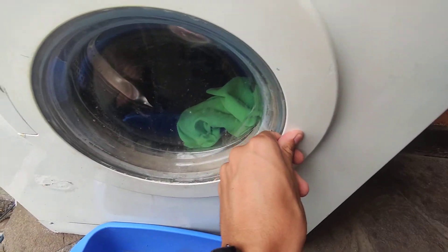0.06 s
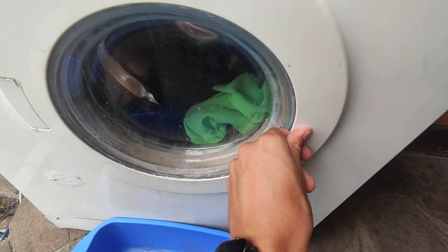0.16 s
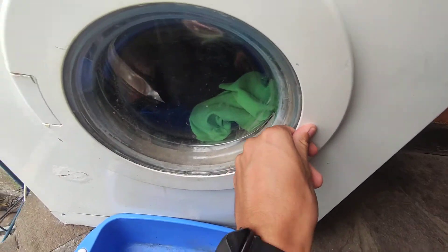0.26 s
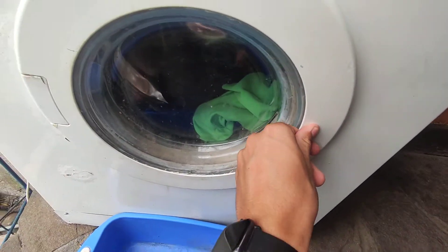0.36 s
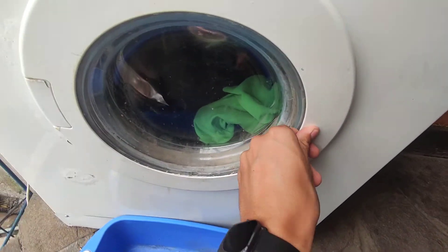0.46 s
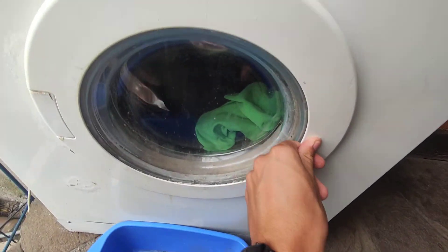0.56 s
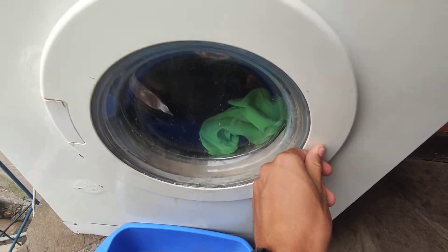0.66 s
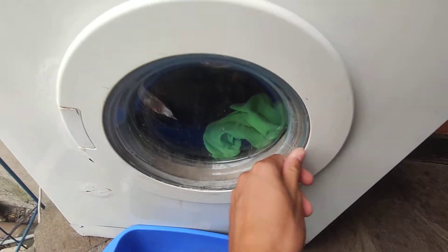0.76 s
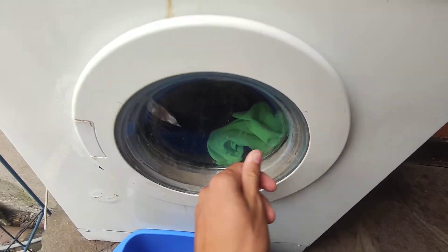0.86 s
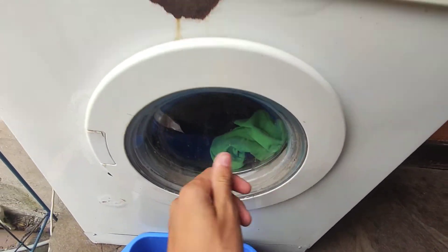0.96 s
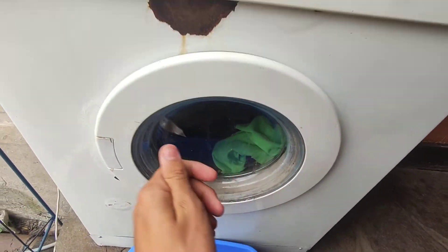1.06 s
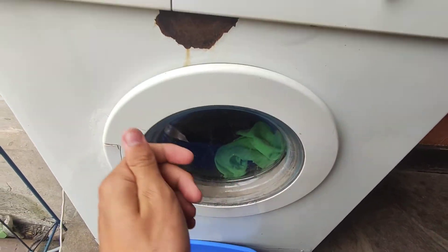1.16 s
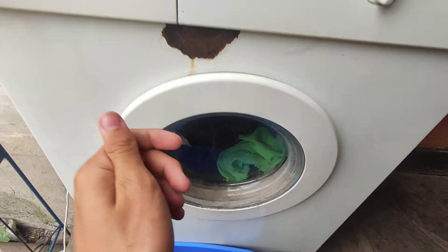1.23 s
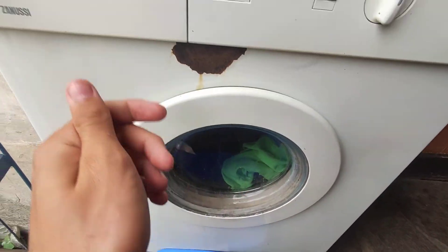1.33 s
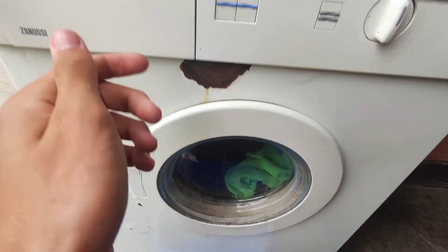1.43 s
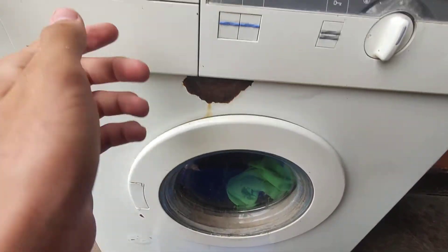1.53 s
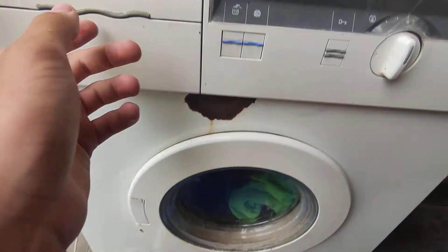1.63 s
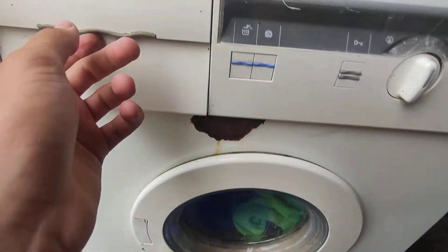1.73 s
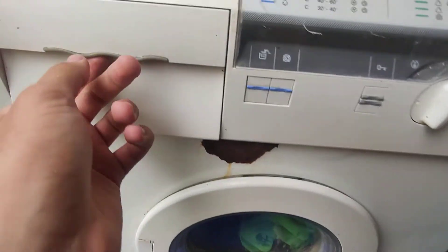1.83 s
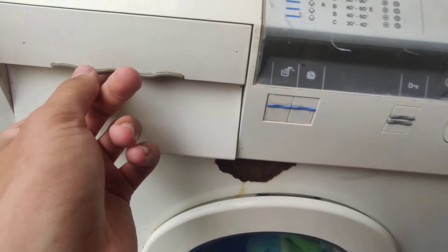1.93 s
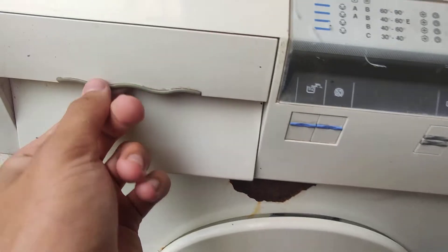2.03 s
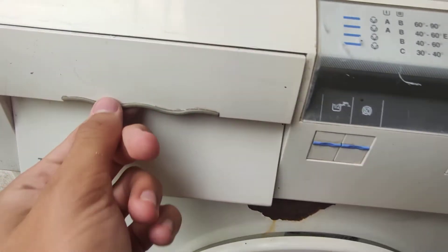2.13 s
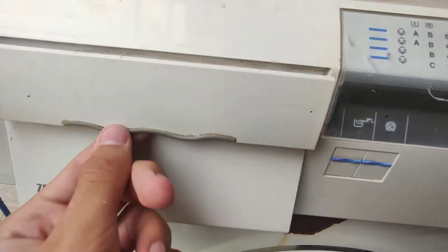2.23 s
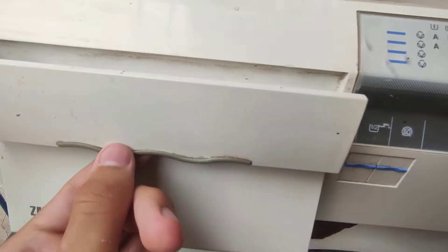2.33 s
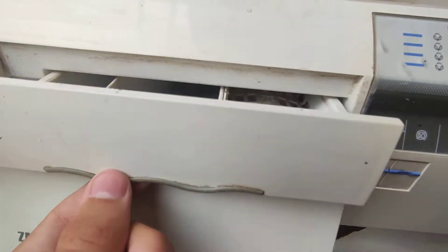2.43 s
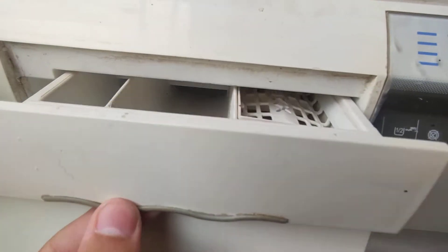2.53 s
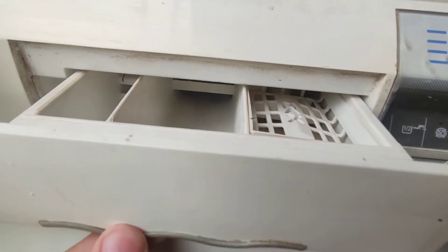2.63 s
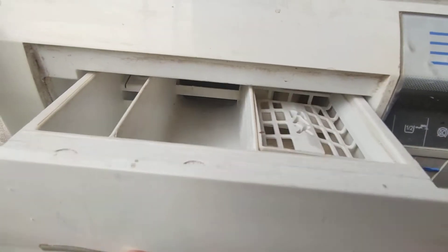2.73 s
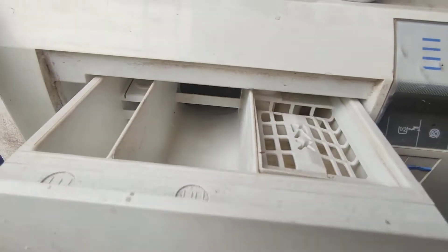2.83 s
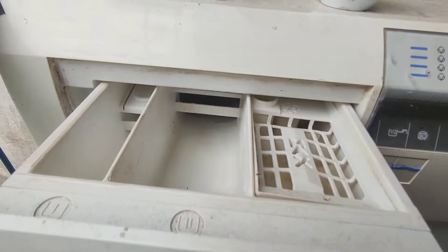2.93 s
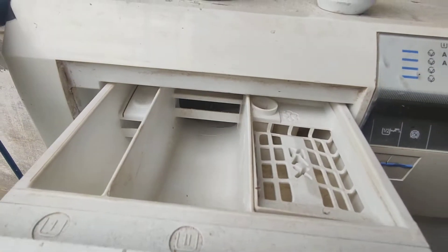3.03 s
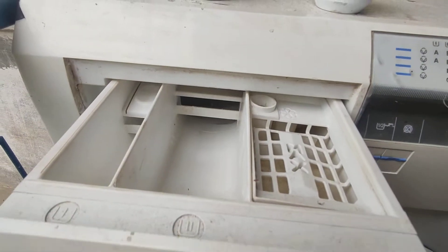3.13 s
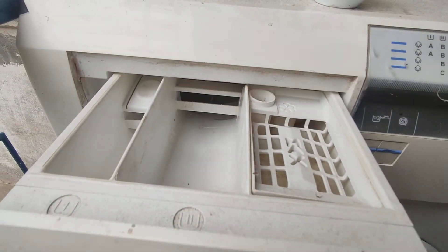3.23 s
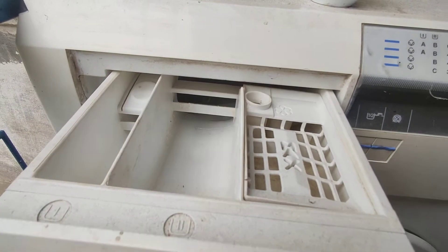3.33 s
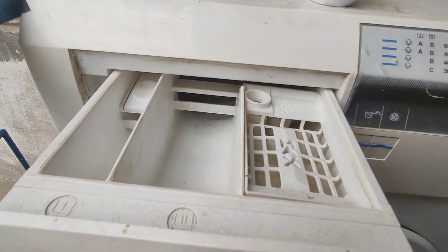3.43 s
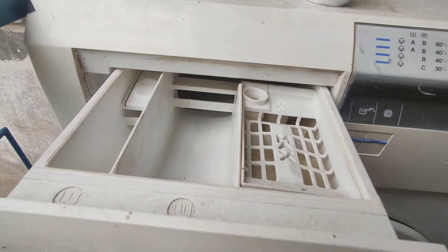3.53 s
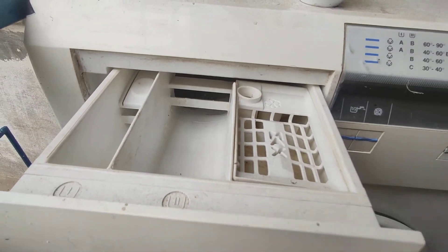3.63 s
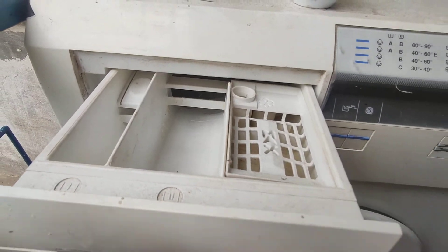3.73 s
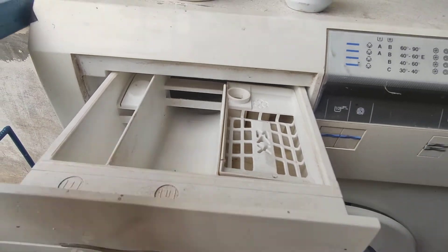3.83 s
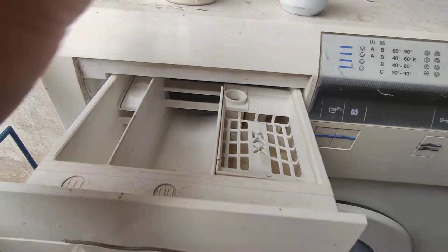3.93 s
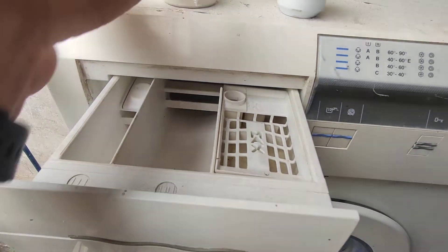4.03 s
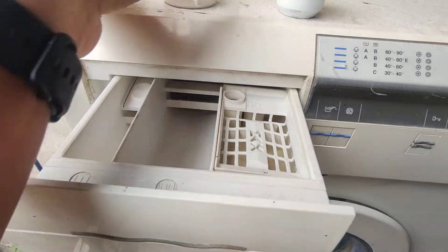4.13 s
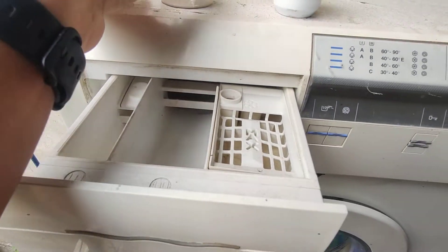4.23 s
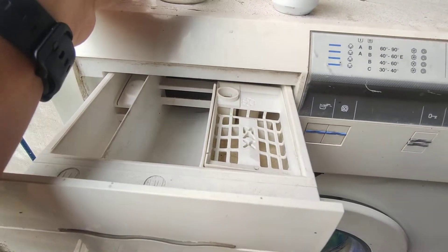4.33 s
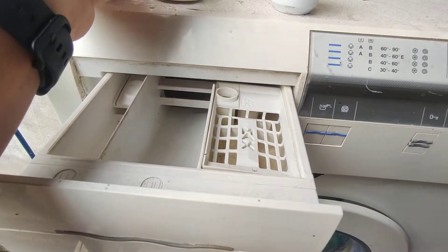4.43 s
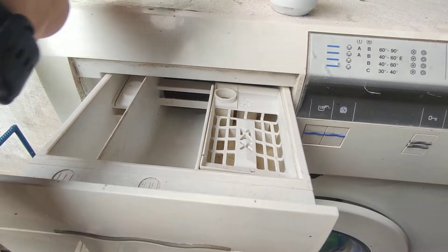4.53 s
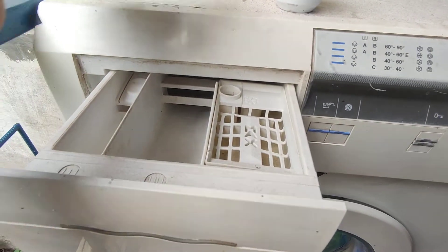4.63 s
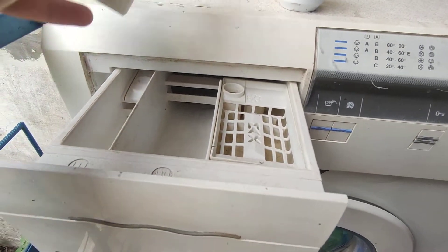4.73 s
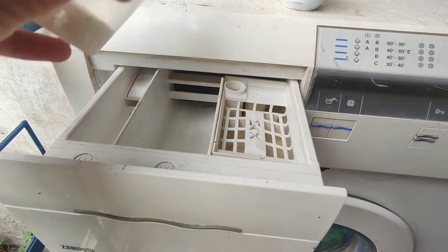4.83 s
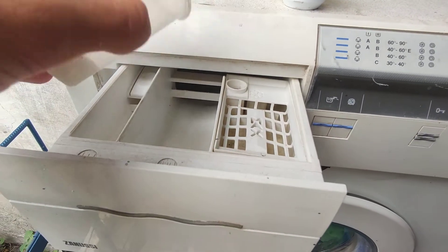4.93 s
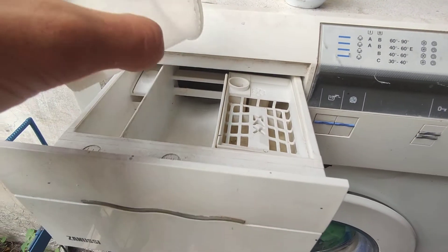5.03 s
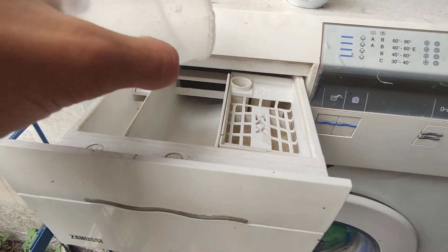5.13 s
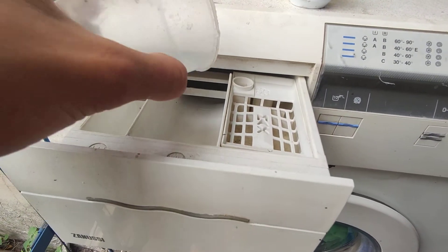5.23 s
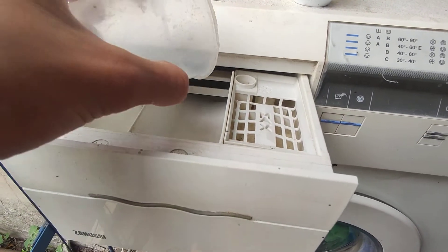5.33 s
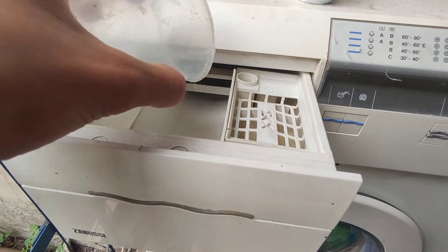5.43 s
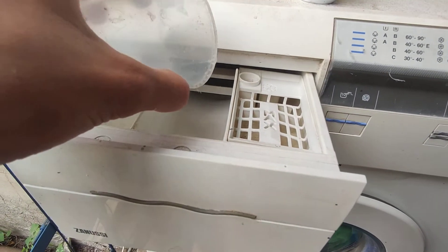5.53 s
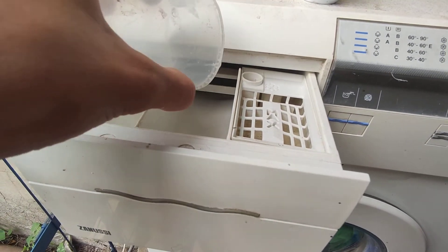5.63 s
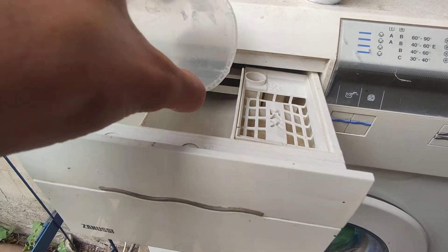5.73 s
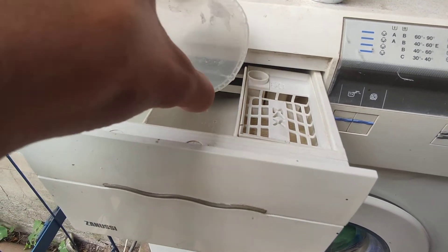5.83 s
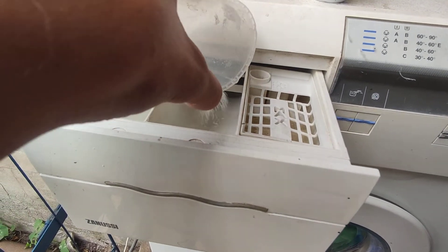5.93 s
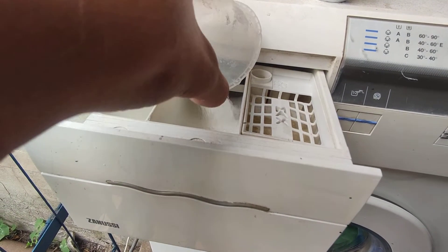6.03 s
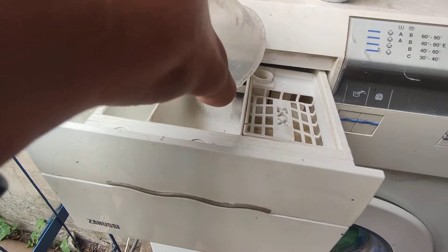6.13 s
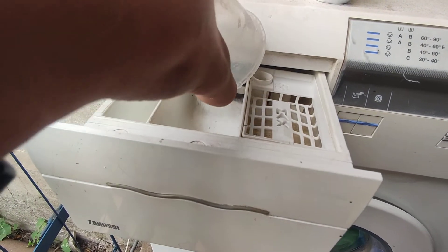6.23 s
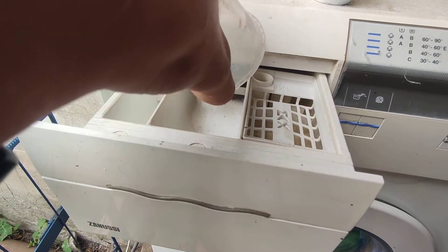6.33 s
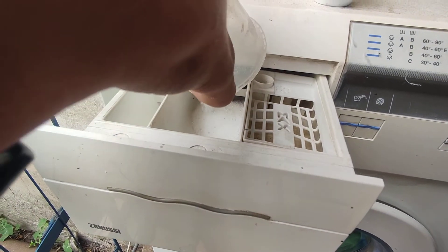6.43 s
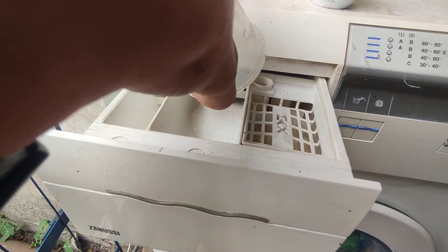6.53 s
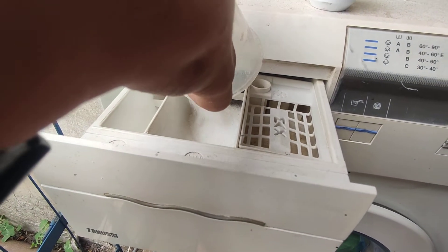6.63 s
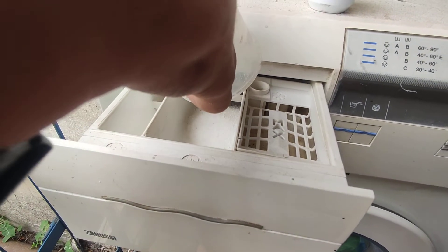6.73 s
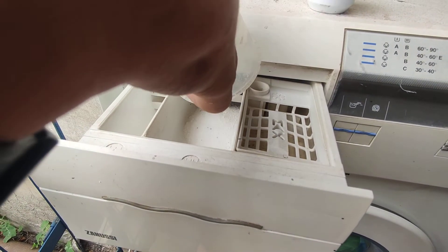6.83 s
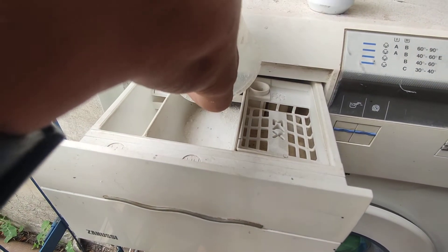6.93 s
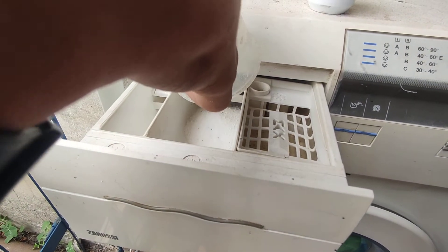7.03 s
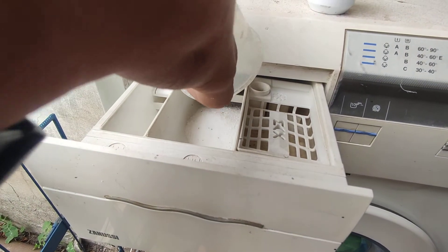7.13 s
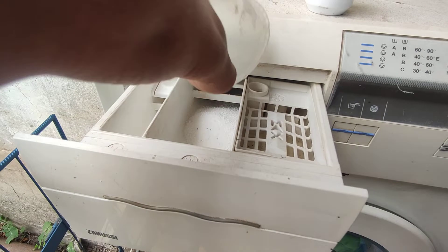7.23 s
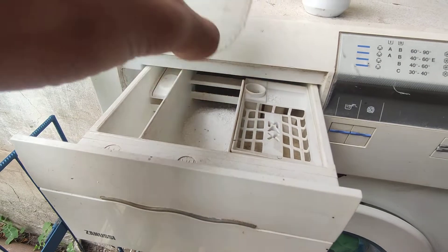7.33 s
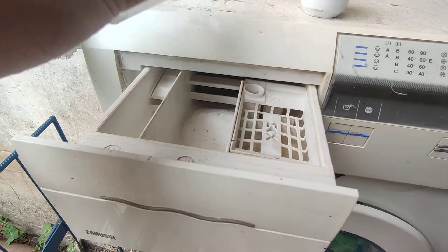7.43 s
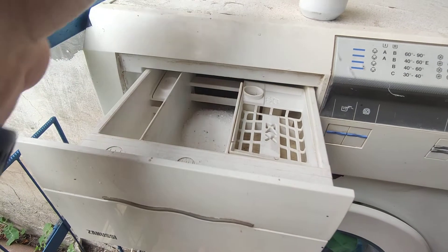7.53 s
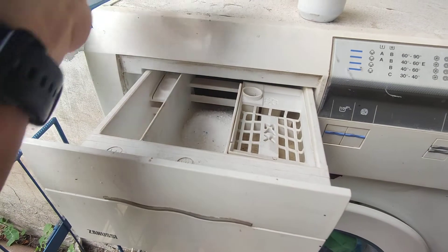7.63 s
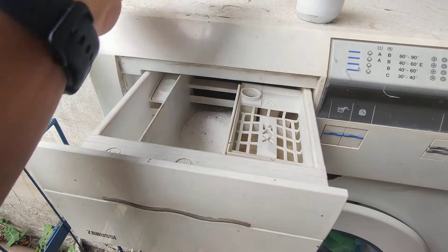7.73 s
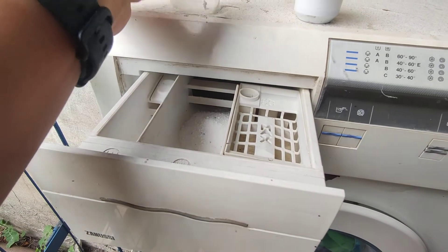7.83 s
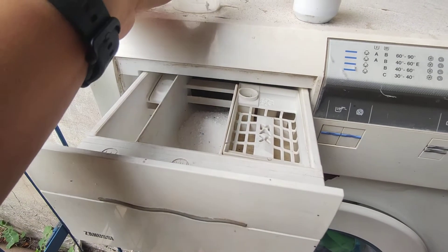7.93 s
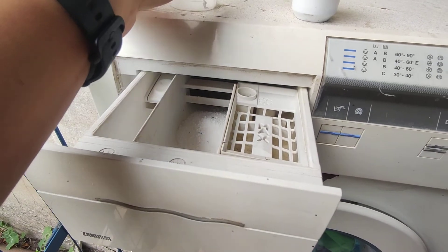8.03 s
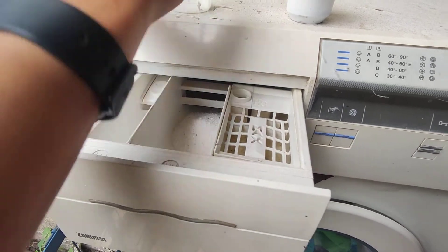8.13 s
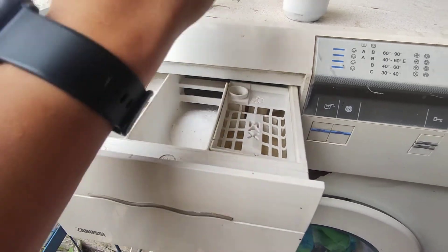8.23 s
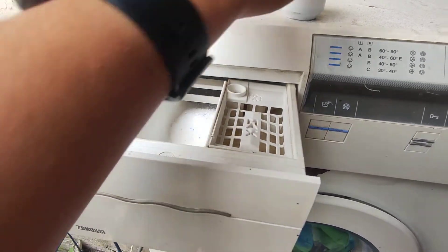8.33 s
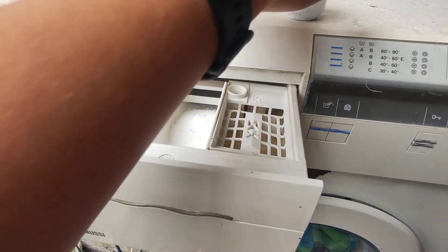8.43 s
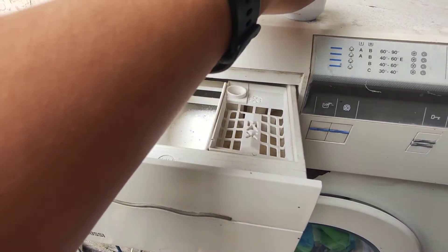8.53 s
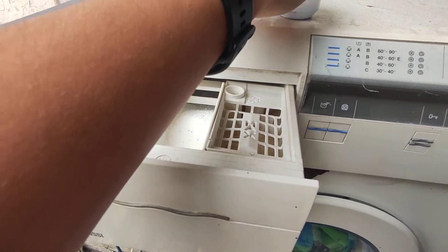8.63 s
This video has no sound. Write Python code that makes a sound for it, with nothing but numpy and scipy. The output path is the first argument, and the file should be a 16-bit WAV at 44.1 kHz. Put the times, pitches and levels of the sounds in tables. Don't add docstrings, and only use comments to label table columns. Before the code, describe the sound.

A phone held near a washer picks up one loud door thud, soft sleeve and dry skin brushing, then a stuttering plastic drawer pull with chirps and grit ticks, ending in a hard bang and a bouncing tray clatter. Quieter handling follows: cloth rustle, crinkly cup ticks, thin powder hiss, a hollow cup knock and brief scrape. Hard walls give a short echo over faint traffic and motor hum.

```python
import sys
import numpy as np
from scipy import signal
from scipy.io import wavfile
from scipy.ndimage import uniform_filter1d, map_coordinates

SR = 44100
rng = np.random.default_rng(int(sys.argv[2]) if len(sys.argv) > 2 else 0)


def wav_out(sig):
    wavfile.write(sys.argv[1], SR, np.round(np.clip(np.atleast_2d(sig).T, -1, 1) * 32767).astype(np.int16))


def invert_db(x):
    u = np.asarray(x, float) / 20
    return 10 ** u


N = 382347

EDGES = 28 * 2 ** np.arange(0, 9.3, 1 / 3)
CENTRES = np.sqrt(EDGES[1:] * EDGES[:-1])

# [t/s, peak level/dB, boom level/dB, sizzle level/dB, left-right level/dB]
DOOR_BLOWS = [
    (0.038, -42.5, -18, -27, 16),
    (0.072, -25.5, -3, -19, 3),
    (0.0794, -19.5, 2, -11, -2),
    (0.088, 1, -18, -14.5, 1.5),
    (0.0897, -14.5, -11.5, -7.5, -5.5),
    (0.121, -24, 1, -34.5, 0),
    (0.534, -29, -9, -34, 6.5),
    (0.541, -32, -4, -26, -2),
    (0.614, -41, -7, -6, -1),
    (0.634, -46.5, 14.5, -2, 0),
]
# [t/s, peak level/dB, boom level/dB, sizzle level/dB, left-right level/dB]
LATCH_PING = [
    (0.244, -39.5, -23, 0.5, 1),
]
# [t/s, peak level/dB, boom level/dB, sizzle level/dB]
DRAWER_BLOWS = [(1.73, -40, -1.5, -42), (1.762, -39, -4, -33), (1.885, -37, -14, -28), (1.927, -43, -8, 17),
                (2.093, -36, -8, 0), (2.142, -29, -13.5, -56), (2.227, -26.5, -3.5, -62),
                (2.257, -18.5, -17.5, -16), (2.274, -20.5, -23, -29), (2.286, -20.5, -33, -29),
                (2.344, -18.5, -11, -28), (2.367, -31, 7.5, -44), (2.39, -40, 3, -44), (2.43, -43, 12, -38),
                (2.524, -32, -6, -30), (2.543, -29, -3, -40), (2.554, -21.5, -7, -26),
                (2.71, -21, -40, -40), (2.7145, -35, -37, -39), (2.77, -32, 3.5, -41),
                (2.79, -24.5, -12.5, -18)]
# [t/s, peak level/dB, left-right level/dB]
RUNNER_TICKS = [(2.2293, -46, 2), (2.2577, -36, 9), (2.2752, -34, 9), (2.3071, -33, 2), (2.336, -31, -1),
                (2.3425, -35, -1), (2.544, -29, -2), (2.5525, -29, 2), (2.7097, -32, 6), (2.7885, -30, 1),
                (2.838, -38.5, 1.5), (2.87, -42, 0), (2.287, -36.5, 4.5), (2.571, -36, 6),
                (2.715, -35, -3.5), (2.818, -41.5, 2)]
# [t/s, peak level/dB, boom level/dB, sizzle level/dB, left-right level/dB]
STOP_BLOWS = [
    (3.3277, 1.5, -6.5, -19, -1),
    (3.331, -5, -7, 1, 3.5),
    (3.342, -16.5, -12.5, -14, 1.5),
    (3.349, -25, 11, -20.5, 1),
    (3.375, -29.5, 12, -30, 0),
    (3.4118, -22, -18, -17, 4),
]
# [t/s, peak level/dB, boom level/dB, sizzle level/dB]
TRAY_BLOWS = [
    (3.634, -7, -18, -8),
    (3.64, -13, -4.5, -14),
    (3.644, -16, -9, -14.5),
    (3.654, -13.5, -8, -16),
    (3.664, -19.5, -31.5, -23),
]
# [t/s, peak level/dB, boom level/dB, sizzle level/dB]
CUP_BLOWS = [
    (4.407, -50, 1, -6),
    (4.498, -51, -17, -7),
    (4.52, -41, -11.5, -14),
    (6.328, -35.5, -32, -38),
    (6.511, -29.5, -31, -36),
    (7.911, -13.5, -22, -36.5),
    (7.933, -36, -22, -26),
]
# [t/s, peak level/dB, sizzle level/dB]
CUP_SNAPS = [(5.11, -61, -5.5), (5.1384, -56, -4.5), (5.183, -76, -15), (5.23, -60.5, -4),
             (5.573, -40, -40), (5.677, -60, -24), (5.695, -63, -24), (5.734, -50, -26),
             (5.777, -59.5, -16.5), (5.7884, -35.5, -22.5), (5.81, -66, -19), (5.87, -50, -26.5),
             (5.901, -59, -17), (5.932, -56, -20), (6.012, -46.5, -20), (6.044, -38, -20),
             (6.843, -61, -11)]
# [t/s, length/s, f/Hz,
# level/dB, left-right level/dB]
SQUEAKS = [(.0878, 0.0012, 1580, -7, 5), (1.729, 0.0089, 1016, -31, -1), (1.74, 0.016, 420, -42, 0),
           (1.764, 0.0069, 665, -40, 0), (1.884, 0.013, 1010, -32.5, -1), (1.898, 0.011, 1020, -35, -4),
           (1.9, 0.031, 430, -37.5, -1), (2.139, 0.0049, 1080, -31.5, -1), (2.228, 0.0072, 1773, -36, 9.5),
           (2.299, 0.016, 1602, -10, -1.5), (2.318, .005, 1650, -29, -5), (2.543, 0.0066, 1910, -36, -4.5),
           (2.553, 0.0056, 1950, -23, -4.5), (2.71, 0.0093, 1937, -27.5, -2),
           (2.792, 0.011, 1244, -22, -1.5), (2.812, .016, 1570, -46, -6), (2.834, 0.011, 1434, -21.5, 0.5),
           (3.411, 0.008, 1250, -19.5, 1.5), (3.4105, 0.0059, 1700, -26, 2), (3.413, .008, 2160, -23, 1.5),
           (3.607, 0.011, 1170, -36.5, -4.5), (2.508, 0.0068, 910, -35, -4)]

# [f/Hz, level/dB, time to fall 60 dB/s]
DOOR_RING = [(107.7, -11, 0.42), (125, -3, 0.096), (139.7, 7.5, 0.14), (151.9, 2, 0.069),
             (233.4, -0.5, 0.18), (305, -8, .2), (360.6, -4.5, .15), (483, -16, 0.095), (801, -27, 0.17),
             (1380, -4.5, 0.028), (1830, 0.5, 0.014), (1325, -20.5, 0.037), (1650, -14, 0.026),
             (2380, -1.5, 0.022)]
SPRING_RING = [(12300, -8, 0.04), (12720, 3, 0.074), (12900, -1, 0.084), (12960, -7, 0.17),
               (13500, -12, 0.04), (13550, -18, .03)]
DRAWER_RING = [(126, -9.5, 0.235), (245, -0.5, 0.34), (306, -2, 0.2), (402, -15, 0.073), (441.4, -27, 0.1),
               (732, -5, 0.05), (998, -35, 0.039), (1230, -14, 0.082), (1580, -19, 0.058),
               (2030, -2.5, 0.043), (2450, -4, 0.02), (3007, -7, 0.043), (3970, -16, 0.037)]
RUNNER_RING = [(1860, 9, 0.015), (3360, -5, 0.0067), (5150, -10, .006)]
STOP_RING = [(127.6, -17.5, .5), (181, -7, 0.06), (234.2, -2, 0.25), (317, 3.5, 0.069), (350, 4.5, 0.068),
             (534.5, -11, 0.065), (666, -12.5, 0.08), (1155, -4, 0.08), (1350, -8, .06),
             (1650, -10.5, 0.092), (2094, -7.5, 0.046), (2380, -3, 0.045), (2960, -7.5, 0.056),
             (3490, -16, 0.033)]
TRAY_RING = [(263, -1, 0.25), (418, 1.5, 0.037), (770, -7.5, 0.096), (1027, -9.5, 0.21),
             (1099, -2.5, 0.039), (1289, -11.5, 0.081), (1580, -6.5, 0.098), (1890, -12, 0.053),
             (2080, -7.5, 0.08), (2457, -10, 0.098), (2660, -20, 0.057), (3050, -12.5, 0.08),
             (3381, -9.5, .05), (4320, -13.5, 0.044)]
CUP_RING = [(180.7, -16, 0.11), (318, -13, 0.098), (405, 11.5, 0.097), (665, 0, 0.068), (678, 1, 0.08),
            (755, -9, 0.093), (1065, -12, 0.074), (1280, -2.5, 0.019), (1700, -8, 0.029)]
CUP_WALL_RING = [(4500, 1, 0.0082), (5160, -4.5, 0.012), (8040, -2.5, 0.011)]

# [f/Hz, level/dB per Hz]
DOOR_CRACK = [(60, -12.5), (130, 4), (350, 13.5), (600, -14.5), (1400, -10), (2500, -12.5), (7000, -17),
              (16000, -15.5)]
DRAWER_CRACK = [(80, -8), (300, 18), (500, -6.5), (1200, 0), (2300, -1), (4500, -18.5), (9000, -20),
                (16000, -47)]
STOP_CRACK = [(130, -33), (230, 10), (380, 0), (600, -4.5), (1400, 2), (3000, -7), (6000, -15),
              (16000, -31.5)]
TRAY_CRACK = [(80, -21), (270, 4.5), (1000, -6.5), (2000, -2.5), (4000, -11.5), (8000, -14), (12000, -18.5),
              (16000, -17)]
CUP_CRACK = [(80, -21), (330, 7), (660, -33), (1100, -73), (2800, -57), (4300, -30.5), (16000, -35.5)]
SNAP_CRACK = [(500, -37), (2000, -11), (3300, -12), (4900, -2), (6500, -1), (8500, -4), (12000, -4),
              (16000, -7)]

# [t/s, hold/s, level/dB]
SLEEVE = [
    (0.291, .001, -66),
    (0.532, .12, -56.5),
    (0.916, .01, -60),
    (1.01, 0.39, -70.5),
    (1.351, .01, -53),
]
# [t/s, hold/s, level/dB]
HAND = [
    (1.562, .01, -60.5),
    (1.577, 0.025, -41),
    (1.61, 0.078, -47.5),
    (1.75, .1, -73),
    (1.882, 0.048, -58.5),
    (2.092, 0.0056, -57),
    (2.21, 0.006, -59),
]
# [t/s, hold/s, level/dB]
PALM = [
    (1.56, 0.096, -97),
    (1.625, 0.019, -45.5),
    (1.661, 0.0098, -40.5),
    (1.67, .012, -46),
]
# [t/s, hold/s, level/dB]
SLIDE = [
    (2.24, 0.105, -52.5),
    (2.36, .1, -59.5),
    (2.471, .64, -52),
    (3.325, .002, -41),
]
# [t/s, hold/s, level/dB]
JUDDER = [
    (2.272, 0.011, -40),
    (2.305, 0.0073, -41),
    (2.336, 0.015, -41),
    (2.571, 0.013, -43.5),
    (2.654, .005, -46),
    (2.753, 0.0053, -59),
    (2.816, 0.0096, -42.5),
    (2.873, 0.037, -54.5),
]
# [t/s, hold/s, level/dB]
TRAY_TIP = [
    (3.606, 0.012, -54),
    (3.627, .014, -42.5),
]
# [t/s, hold/s, level/dB]
REACH = [
    (3.721, 0.0022, -53),
    (3.871, 0.063, -62.5),
    (4.0, 0.53, -72.5),
    (4.39, 0.0074, -62.5),
    (4.51, .005, -58.5),
    (4.6, 0.44, -90),
]
# [t/s, hold/s, level/dB]
POWDER = [
    (5.15, .25, -65.5),
    (5.45, 0.61, -75),
    (5.575, 0.0093, -65.5),
    (5.737, 0.0085, -70),
    (5.9, 0.48, -59),
    (6.015, 0.042, -51.5),
    (6.399, 0.15, -66),
    (6.6, 0.085, -57),
]
# [t/s, hold/s, level/dB]
CUP_DRAG = [
    (7.93, 0.026, -46.5),
    (8.07, 0.017, -56),
    (8.151, 0.478, -77),
]
# [t/s, hold/s, level/dB of its faint part above 2.5 kHz]
DRONE = [
    (.8, 0.64, -89.5),
    (6.302, 1.3, -94),
]

# [f/Hz, level/dB per Hz]
SLEEVE_COLOUR = [(500, -0.5), (1000, 14), (3200, 11), (5500, -0.5), (8700, 6.5), (16000, -46.5)]
HAND_COLOUR = [(1200, -20), (3300, -12), (4500, -13), (5500, -12.5), (9000, -15.5), (12000, -22),
               (16000, -15)]
PALM_COLOUR = [(500, -12), (1100, -1.5), (1800, 0), (2400, -1), (3000, -4), (3700, -8), (5000, -26.5)]
SLIDE_COLOUR = [(100, -22.5), (300, 7), (550, -17), (900, 0), (1600, 0), (3200, -12), (6500, -17.5),
                (16000, -29.5)]
JUDDER_COLOUR = [(400, -10), (1200, 9.5), (2000, 7.5), (3500, -1), (5300, -10.5), (7000, -16.5),
                 (16000, -29)]
REACH_COLOUR = [(1000, 0.5), (2000, -8.5), (3700, -15.5), (5600, -18), (9000, -24.5), (16000, -24)]
POWDER_COLOUR = [(1000, 10.5), (2000, 6.5), (4500, 2), (6500, 3.5), (7400, 23), (8500, -2.5), (12000, -8),
                 (16000, 28)]
DRAG_COLOUR = [(500, 0), (1700, -6), (2200, -16), (3100, -18), (4000, -9.5), (5500, -16), (8000, -18.5),
               (16000, -24)]
DRONE_COLOUR = [(500, -13.5), (820, 13.5), (1150, -19), (2500, -31), (16000, -61)]

# [f/Hz, level/dB per Hz]
YARD_COLOUR = [(18, -37), (64, -2.5), (328, -3.5), (430, -9.5), (1600, -21.5), (2010, -32), (8500, -54.5),
               (16000, -52.5)]
# [t/s, level/dB, brightness/dB per octave]
BACKGROUND_LEVEL = [(0.0, -44, 0.5), (2.17, -44.5, 1.23), (2.44, -41, 1.7), (3.16, -51.5, 1.2), (3.4, -52, 4),
                    (3.702, -49.5, 1.5), (8.67, -50.5, 0)]
# [f/Hz, likeness, 1 = same]
LIKENESS = [(60, 0.79), (180, 1), (550, -0.44), (1650, 1), (4970, -0.51), (15000, -1.1)]
# [f/Hz, width/Hz, level/dB]
HUM = [(57.5, 7.1, -63), (112, 6.2, -59), (292, 33, -57.5), (429.5, 13, -58.5)]
# [t/s, level/dB]
HUM_SWELL = [(0.0, -34), (0.77, -103), (2.73, -55.5), (3.84, -67.5), (7.05, -54), (8.06, -54),
             (8.67, -52.5)]
# [f/Hz, time to fall 60 dB/s]
ECHO_T60 = [(100, 0.47), (200, 0.59), (1000, 0.27), (4000, 0.25), (12000, 0.19)]
# [f/Hz, width/Hz, level/dB]
PORTS = [(8500, 1500, 4), (7200, 450, -6), (11350, 600, -10)]


def at_hz(points, hz):
    table_hz, values = np.array(points)[:, 0], np.array(points)[:, 1]
    return np.interp(np.log(hz), np.log(table_hz), values)


def noise_bank(size):
    white = rng.standard_normal((2, size)).astype(np.float32)
    bands = []
    for k, edge in enumerate(zip(EDGES, EDGES[1:])):
        sieve = signal.butter(2, edge, "band", fs=SR, output="sos")
        bands.append(signal.sosfilt(sieve, white[k % 2]).astype(np.float32))
    return np.array(bands)


def drift(rate_hz, count, size):
    knots = rng.standard_normal((count, int(size / SR * rate_hz * 2) + 2))
    rows = [np.interp(np.arange(size), np.linspace(0, size, len(row)), row) for row in knots]
    return np.array(rows) * 0.99


def band_gains(colour, from_hz):
    gain = invert_db(at_hz(colour, CENTRES))
    power = gain ** 2 * np.diff(EDGES) / (SR / 2)
    return gain / np.sqrt(power[CENTRES > from_hz].sum())


def narrow_band(hz, width_hz):
    r = np.exp(-np.pi * width_hz / SR)
    return [1, -2 * r * np.cos(2 * np.pi * hz / SR), r * r], r


def add(out, sound, s, pan_db, lag):
    bass = signal.sosfilt(signal.butter(1, 500, fs=SR, output="sos"), sound)
    for channel, late, side in ((0, max(lag, 0), 1), (1, max(-lag, 0), -2.1)):
        start = round(s * SR) + round(late)
        part = (bass + (sound - bass) * invert_db(side * pan_db))[:N - start]
        out[channel, start:start + len(part)] += part


def placed(blows, pan_db, pan_db_per_s):
    return [blow + (pan_db + pan_db_per_s * (blow[0] - blows[0][0]),) for blow in blows]


def hardness(hz, boom_db, sizzle_db):
    corners = np.log([350, 800, 2500, 7000])
    return invert_db(np.interp(np.log(hz), corners, [boom_db, 0, 0, sizzle_db + 12.0]))


def struck(out, bank, blows, modes, crack, ring_db, crack_db, crack_s, rattle_db, rattle_s, rise_s, lag):
    t = np.arange(SR // 3) / SR
    hz, level_db, t60 = np.transpose(modes)[:, :, None]
    chance = rng.random((len(blows), len(modes) + 1))
    slower = (CENTRES[:, None] / 2000) ** -.3
    dying = invert_db(-60 * t / (crack_s * slower)) + invert_db(rattle_db - 60 * t / (rattle_s * slower))
    dying = dying + invert_db(8.0 - 60 * t / 0.0011)
    buzz = invert_db(5 * np.clip(t / .04, 0, 1) * drift(45, count=len(modes), size=len(t)))
    contact = 1 - np.exp(-t / rise_s)
    for (s, peak_db, boom_db, sizzle_db, pan_db), luck in zip(blows, chance):
        mode_db = level_db + 8.4 * luck[1:, None] - 60 * t / t60
        rings = buzz * hardness(hz, boom_db, sizzle_db) * invert_db(mode_db) * np.sin(2 * np.pi * hz * t)
        first = int(luck[0] * (N - len(t)))
        colour = band_gains(crack, 700) * np.minimum(hardness(CENTRES, boom_db, sizzle_db), 2)
        burst = (colour[:, None] * dying * bank[:, first:first + len(t)]).sum(0)
        sound = invert_db(ring_db) * rings.sum(0) + invert_db(crack_db) * burst
        add(out, invert_db(peak_db) * contact * sound, s, pan_db, lag)


def stroked(strokes, rise_s, fall_s):
    first = min(row[0] for row in strokes) - 2 * rise_s
    last = max(row[0] + row[1] for row in strokes) + 2 * fall_s
    t = np.arange(int(first * SR), min(int(last * SR), N)) / SR
    power = np.zeros(len(t))
    for s, hold, level_db in strokes:
        decades = np.clip(s - t, 0, None) / rise_s + np.clip(t - s - hold, 0, None) / fall_s
        power = power + (invert_db(level_db) / 10 ** np.minimum(decades, 10)) ** 2
    return t, np.sqrt(power)


def rubbed(out, bank, rows, colour, rise_s, fall_s, grain_db, grain_hz, pan_db, lag, patch_db=3.0):
    t, speed = stroked(rows, rise_s, fall_s)
    flurry = grain_db * drift(grain_hz, count=1, size=len(t))
    flurry = flurry + patch_db * drift(25, count=len(CENTRES), size=len(t))
    gain = band_gains(colour, 2500)[:, None] * np.exp(flurry * (np.log(10) / 20))
    for first, spot_db, spot_lag in ((0, -2.5, lag), (N - len(t), -4, lag * 0.5)):
        sound = (gain * bank[:, first:first + len(t)]).sum(0)
        add(out, sound * speed * invert_db(spot_db), t[0], pan_db, spot_lag)


def yard(side):
    t, (s, level_db, tilt_db) = np.arange(N) / SR, np.transpose(BACKGROUND_LEVEL)
    alike = np.clip(at_hz(LIKENESS, CENTRES), 0, 1)
    out = np.zeros((2, N))
    tilt, patches = np.interp(t, s, tilt_db), drift(4, count=len(CENTRES), size=N)
    gains, middle = band_gains(YARD_COLOUR, 100), noise_bank(size=N)
    for hz, gain, c, m, d, patch in zip(CENTRES, gains, alike, middle, side, patches):
        sway_db = tilt * np.log2(hz / 400) + 2.0 * patch
        sway = gain * np.exp(sway_db * (np.log(10) / 20)) / np.sqrt(1 + c)
        out += sway * (np.sqrt(1 + c) * m + np.sqrt(1 - c) * d[::-1] * [[1], [-1]])
    out *= invert_db(np.interp(t, s, level_db))
    swell = invert_db(np.interp(t, *np.transpose(HUM_SWELL)) + 62.5)
    for hz, width_hz, hum_db in HUM:
        poles, _ = narrow_band(hz, width_hz)
        band = signal.lfilter([1, 0, -1], poles, rng.standard_normal(N))
        out += invert_db(hum_db) * band / band.std() * swell ** np.clip(80 / hz, 0, 1)
    return out


def far_vehicle(out, bank):
    rubbed(out, bank, DRONE, DRONE_COLOUR, rise_s=.4, fall_s=.4, grain_db=.3, grain_hz=8,
           pan_db=0, lag=5, patch_db=.3)


def door(out, bank):
    struck(out, bank, DOOR_BLOWS, DOOR_RING, DOOR_CRACK, ring_db=-10.5, crack_db=-6.5, crack_s=0.038,
           rattle_db=-19.5, rattle_s=0.14, rise_s=0.0028, lag=1.2)


def walls(dry, bank):
    t = np.arange(SR // 2) / SR
    fall = invert_db(-60 * t / at_hz(ECHO_T60, CENTRES)[:, None]) * np.clip((t - .004) * 100, 0, 1)
    alike = np.clip(at_hz(LIKENESS, CENTRES), 0, 1)[:, None]
    mid = np.sqrt(1 + alike) * bank[:, SR:SR + len(t)]
    side = np.sqrt(1 - alike) * bank[:, 3 * SR:3 * SR + len(t)]
    echoes = np.array([(fall * (mid + side)).sum(0), (fall * (mid - side)).sum(0)])
    echoes = echoes / np.sqrt((echoes ** 2).sum(1))[:, None]
    return signal.fftconvolve(dry, echoes, axes=1)[:, :N]


def squeaks(out):
    for s, length, hz, level_db, pan_db in SQUEAKS:
        t = np.arange(round(length * SR)) / SR
        turn = 2 * np.pi * hz * t
        pair = np.sin(turn) + .45 * np.sin(1.08 * turn)
        chirp = pair + invert_db(-38) * np.sin(2 * turn) + invert_db(-44) * np.sin(4 * turn)
        add(out, invert_db(level_db) * chirp * np.sin(np.pi * t / length) ** 0.55, s, pan_db, lag=12)


def latch(out, bank):
    struck(out, bank, LATCH_PING, SPRING_RING, SNAP_CRACK, ring_db=-13, crack_db=-32, crack_s=0.023,
           rattle_db=-21, rattle_s=.1, rise_s=0.0015, lag=3)


def sleeve(out, bank):
    rubbed(out, bank, SLEEVE, SLEEVE_COLOUR, rise_s=0.088, fall_s=0.13, grain_db=5.0, grain_hz=146,
           pan_db=-1.0, lag=8)


def hand(out, bank):
    rubbed(out, bank, PALM, PALM_COLOUR, rise_s=0.087, fall_s=0.043, grain_db=3, grain_hz=605,
           pan_db=1.0, lag=22, patch_db=4.0)
    rubbed(out, bank, HAND, HAND_COLOUR, rise_s=0.014, fall_s=.06, grain_db=2.5, grain_hz=266,
           pan_db=-1.0, lag=22, patch_db=2.6)


def drawer_knocks(out, bank):
    blows = placed(DRAWER_BLOWS, pan_db=3.0, pan_db_per_s=-6.0)
    struck(out, bank, blows, DRAWER_RING, DRAWER_CRACK, ring_db=-9.0, crack_db=-2.0, crack_s=0.028,
           rattle_db=-18.5, rattle_s=0.065, rise_s=0.00118, lag=9.3)


def runner_grit(out, bank):
    ticks = [(s, db, -20, -14, pan_db) for s, db, pan_db in RUNNER_TICKS]
    struck(out, bank, ticks, RUNNER_RING, JUDDER_COLOUR, ring_db=-6, crack_db=1.0, crack_s=0.012,
           rattle_db=-27, rattle_s=0.026, rise_s=0.00025, lag=11)


def drawer_slide(out, bank):
    rubbed(out, bank, SLIDE, SLIDE_COLOUR, rise_s=.055, fall_s=0.049, grain_db=2.5, grain_hz=353,
           pan_db=-1.0, lag=12)
    rubbed(out, bank, JUDDER, JUDDER_COLOUR, rise_s=.004, fall_s=0.0071, grain_db=1.5, grain_hz=400,
           pan_db=0.0, lag=12)


def drawer_stop(out, bank):
    struck(out, bank, STOP_BLOWS, STOP_RING, STOP_CRACK, ring_db=-14.0, crack_db=-1.5, crack_s=0.017,
           rattle_db=-13.5, rattle_s=0.12, rise_s=0.0013, lag=11.64)


def tray(out, bank):
    rubbed(out, bank, TRAY_TIP, TRAY_CRACK, rise_s=0.01, fall_s=0.0095, grain_db=5.0, grain_hz=200,
           pan_db=-2, lag=-2.5)
    blows = placed(TRAY_BLOWS, pan_db=0.9, pan_db_per_s=0)
    struck(out, bank, blows, TRAY_RING, TRAY_CRACK, ring_db=-9.5, crack_db=-5.5, crack_s=0.044,
           rattle_db=-11.0, rattle_s=0.04, rise_s=0.00025, lag=-1.2)


def reach(out, bank):
    rubbed(out, bank, REACH, REACH_COLOUR, rise_s=.08, fall_s=.07, grain_db=1.0, grain_hz=159,
           pan_db=0.5, lag=-2.0)


def cup(out, bank):
    blows = placed(CUP_BLOWS, pan_db=-1.0, pan_db_per_s=0.5)
    struck(out, bank, blows, CUP_RING, CUP_CRACK, ring_db=-15.0, crack_db=-15.5, crack_s=0.0084,
           rattle_db=3.0, rattle_s=0.11, rise_s=0.00042, lag=5.9)
    snaps = [(s, db, -29, sizzle_db, -2.5) for s, db, sizzle_db in CUP_SNAPS]
    struck(out, bank, snaps, CUP_WALL_RING, SNAP_CRACK, ring_db=5.5, crack_db=0.5, crack_s=0.038,
           rattle_db=-10, rattle_s=.06, rise_s=0.00035, lag=14)


def powder(out, bank):
    rubbed(out, bank, POWDER, POWDER_COLOUR, rise_s=.05, fall_s=.06, grain_db=2, grain_hz=860,
           pan_db=-2.0, lag=15, patch_db=0.2)


def cup_drag(out, bank):
    rubbed(out, bank, CUP_DRAG, DRAG_COLOUR, rise_s=.015, fall_s=0.076, grain_db=3.5, grain_hz=206.0,
           pan_db=-0.3, lag=6)


def scene():
    near, chirps, bank = np.zeros((2, N)), np.zeros((2, N)), noise_bank(size=N)
    for source in (far_vehicle, door, latch, sleeve, hand, drawer_knocks, runner_grit, drawer_slide,
                   drawer_stop, tray, reach, cup, powder, cup_drag):
        source(near, bank)
    squeaks(chirps)
    echoes = walls(near + invert_db(-4.0) * chirps, bank)
    return near + chirps + invert_db(-14) * echoes + yard(bank)


def speckle_treble(x, depth_db, cell_hz, cell_s, open_db):
    hz, s, cells = signal.stft(x, SR, nperseg=1024)
    knots = rng.standard_normal((300, 400))
    grid = np.meshgrid(hz / cell_hz, s / cell_s, indexing="ij")
    speckle = map_coordinates(knots, grid, order=1, mode="wrap")
    power = np.abs(cells) ** 2
    level_db = 10 * np.log10(power.sum((0, 1)) + 1e-12)
    treble_db = 10 * np.log10(power[:, hz > 3000].sum((0, 1)) + 1e-12)
    depth = depth_db * np.clip((hz[:, None] - 1200) / 2600, 0, 1)
    depth = depth * np.clip((open_db - level_db) / 8, 0, 1)
    jump_db = treble_db - uniform_filter1d(treble_db, size=9)
    depth = depth * np.clip(1 - jump_db / 3, 0, 1)
    gain = invert_db(depth * np.minimum(speckle, .5))
    return signal.istft(cells * gain, SR, nperseg=1024)[1][:, :N]


def top_cut(x):
    return signal.sosfilt(signal.butter(12, 15900, fs=SR, output="sos"), x)


def record(dry):
    x = signal.sosfilt(signal.butter(4, 62, "high", fs=SR, output="sos"), dry)
    for hz, width_hz, port_db in PORTS:
        poles, r = narrow_band(hz, width_hz)
        band = signal.lfilter((1 - r * r) / 2 * np.array([1, 0, -1]), poles, x)
        x = x + (invert_db(port_db) - 1) * band
    x = speckle_treble(x, depth_db=14, cell_hz=100, cell_s=.028, open_db=-24)
    mix = 1.071 * np.tanh(x / 1.384)
    return top_cut(mix)


dry = scene()
out = record(dry)
wav_out(out)
```